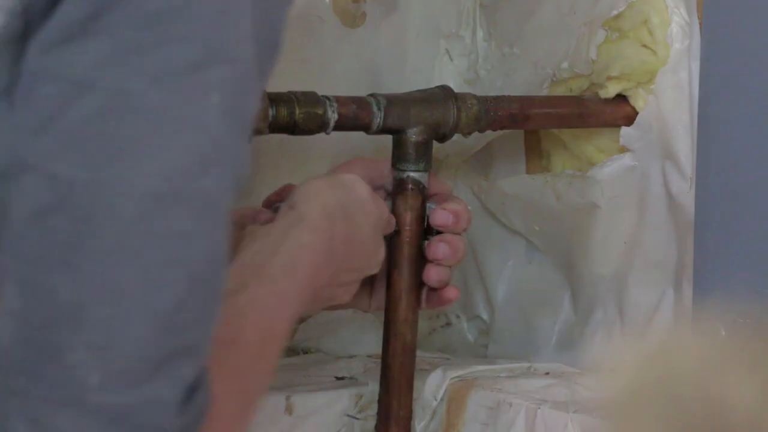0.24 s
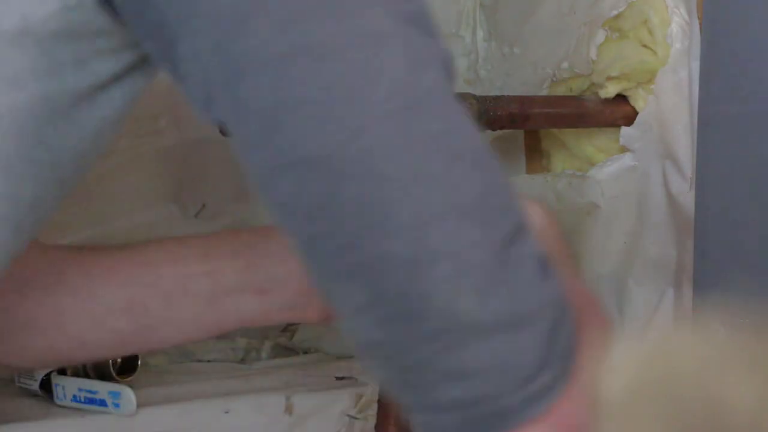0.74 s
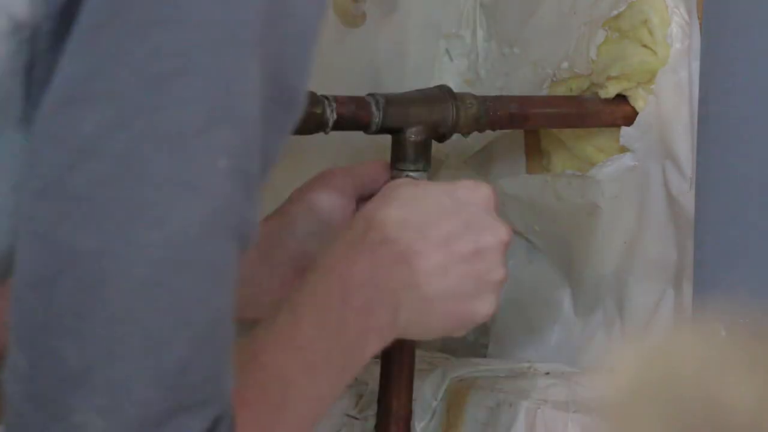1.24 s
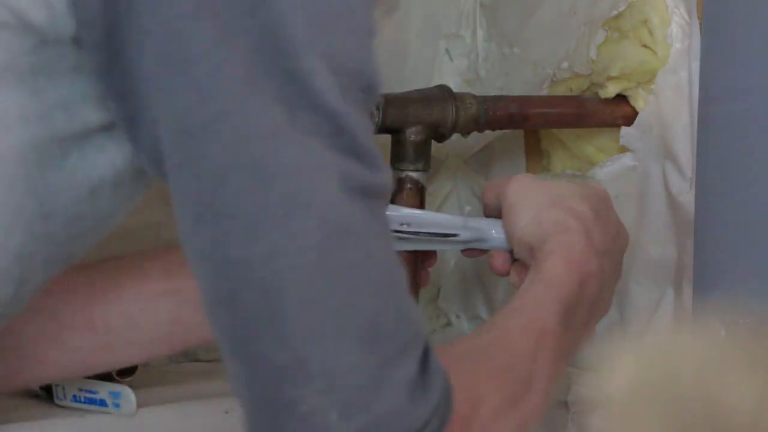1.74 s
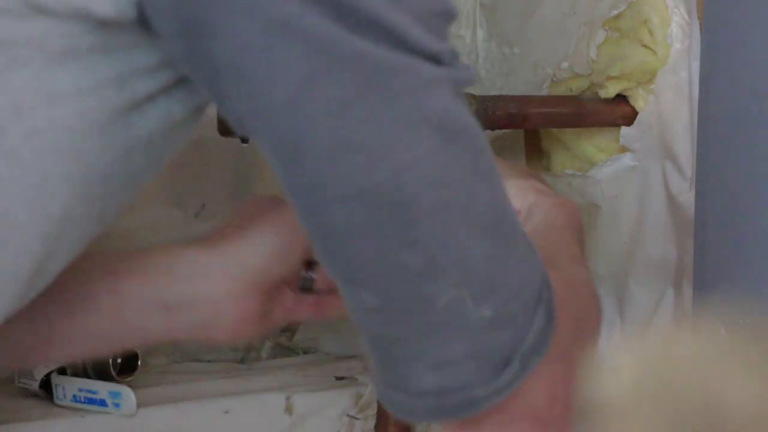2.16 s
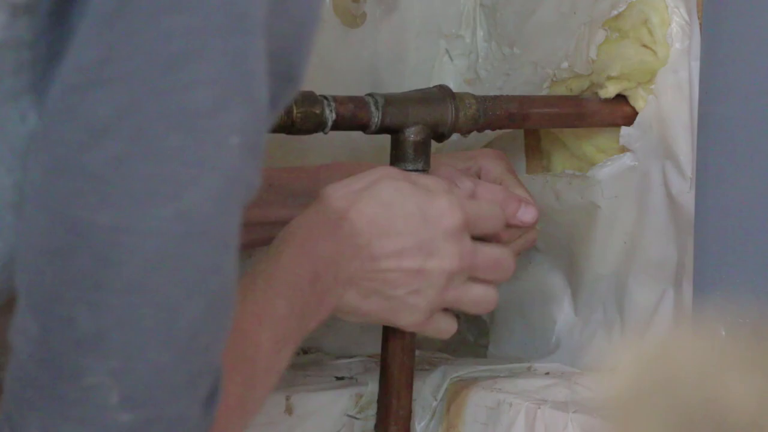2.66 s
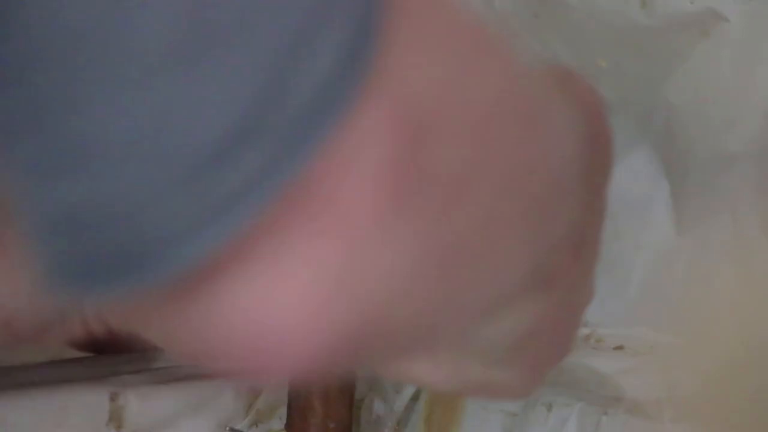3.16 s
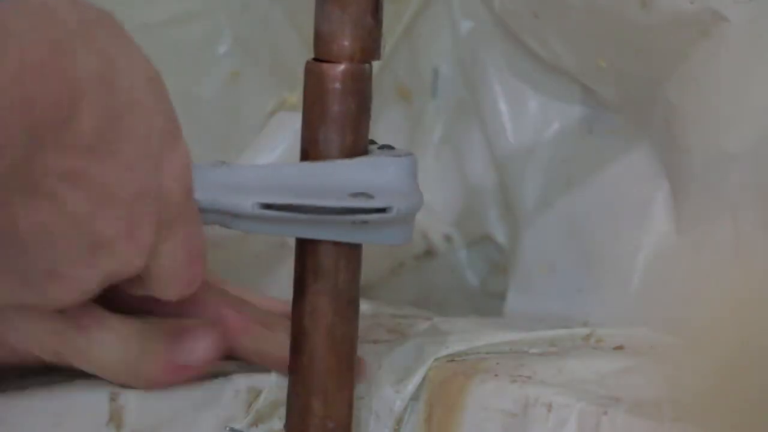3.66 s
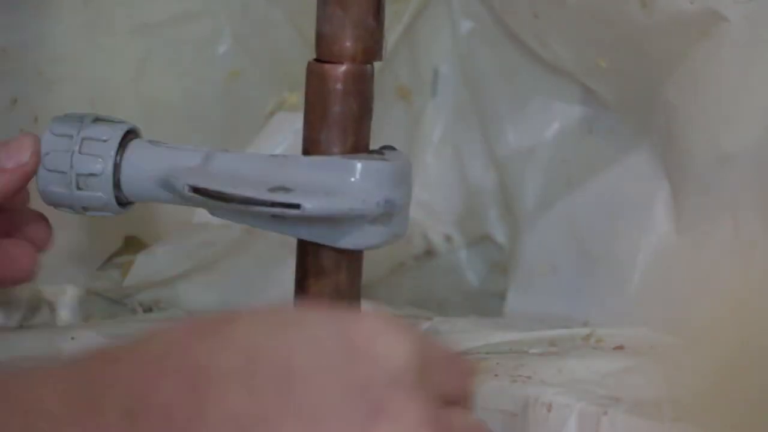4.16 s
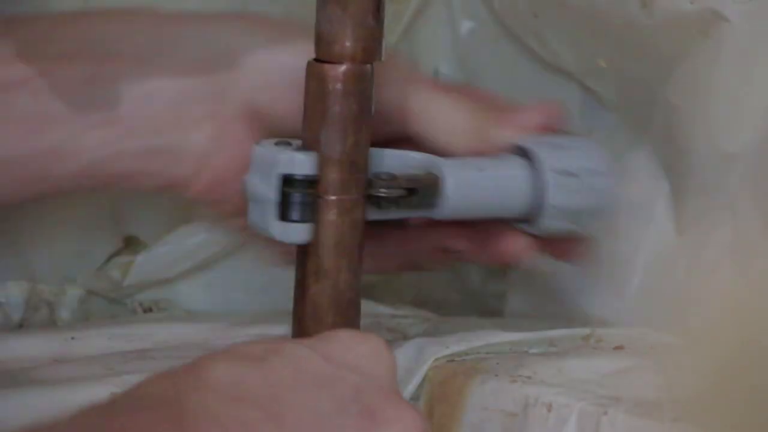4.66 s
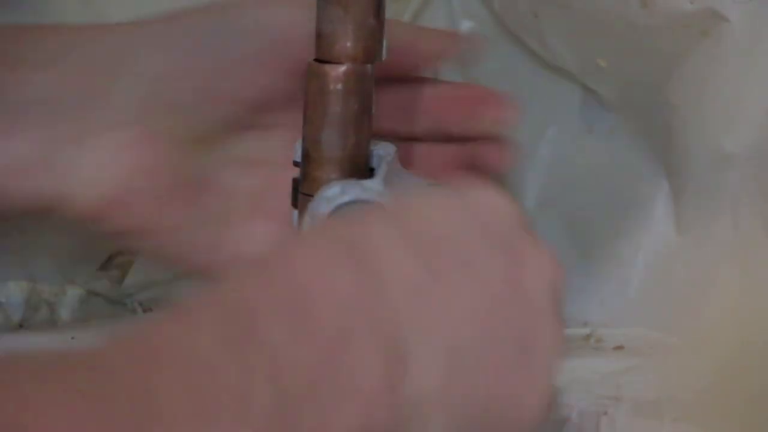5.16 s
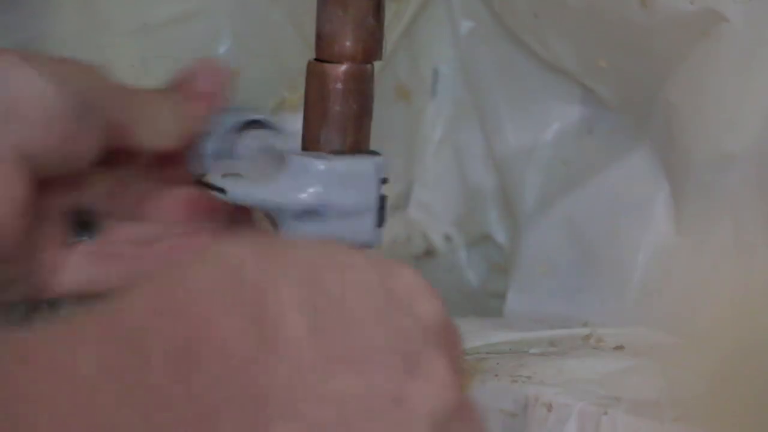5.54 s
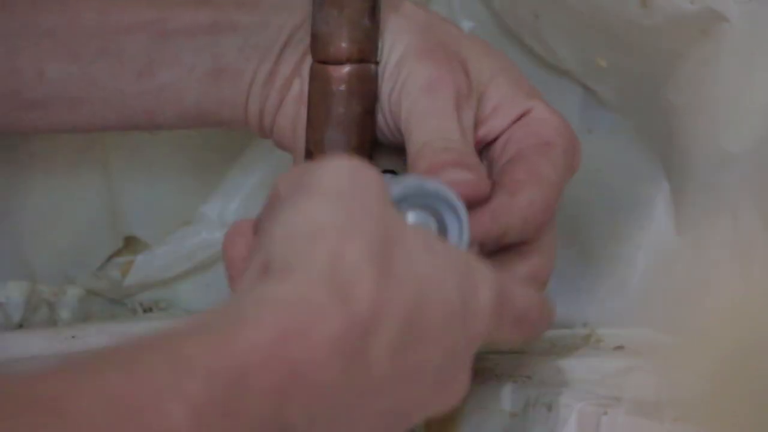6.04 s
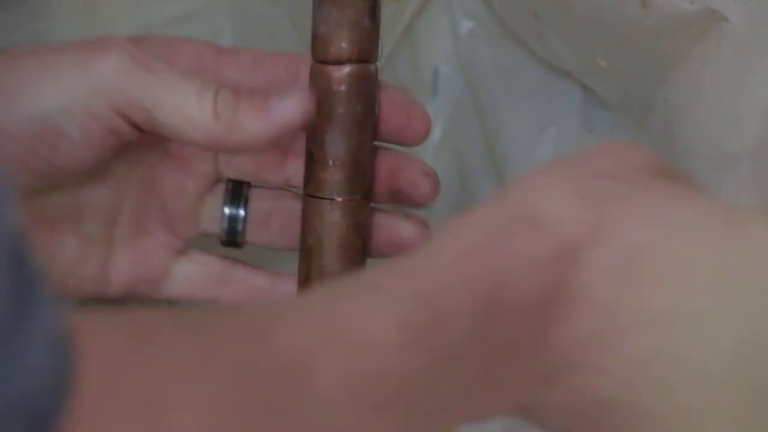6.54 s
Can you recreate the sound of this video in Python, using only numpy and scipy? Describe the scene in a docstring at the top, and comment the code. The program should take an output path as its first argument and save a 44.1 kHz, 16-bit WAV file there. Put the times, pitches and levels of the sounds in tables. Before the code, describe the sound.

In a quiet basement, close to a small microphone, a tubing cutter is worked on a copper pipe. Sparse faint ticks and a few soft thuds come first, then a near-silent gap. From about three seconds sharp metallic clicks cluster with thin scraping; later turns bring rumbling drag, hollow knocks and tiny squeaks. A strong woody thunk comes near the end. Faint mains hum and hiss continue beneath, with a very short room echo.

```python
"""Tubing cutter on a copper pipe

A tubing cutter is swung around a pipe in a quiet basement, close to a small microphone. Noise bursts through
the tool's resonances make its loose parts click; slip noise makes wheel and rollers scrape and rumble, wavering
sines squeak, and decaying modes of pipe and framing thud. Mains hum (sines) and microphone hiss (shaped noise)
lie beneath."""
import sys
import numpy as np
from scipy import signal
from scipy.fft import rfft, irfft
from scipy.io import wavfile
from scipy.ndimage import uniform_filter1d

SR = 44100
rng = np.random.default_rng(int(sys.argv[2]) if len(sys.argv) > 2 else 0)


def master(y):
    """Save y as 16-bit WAV."""
    cut = np.clip(np.atleast_2d(y).T, -1, 1)
    pcm = np.round(cut * 32767)  # scale
    wavfile.write(sys.argv[1], SR, pcm.astype(np.int16))


def voltage_ratio(decibels):
    """Convert decibels (scalar or array-like) to amplitude ratios, 20 dB per decade."""
    exponent = np.asarray(decibels, float) / 20
    return 10 ** exponent


N = 299968

# Modes of the pipe run and framing, shared by knocks and rumble.
# Each row: frequency in Hz, level in dB, undamped-table t60 in seconds (each use sets its own damping).
FRAME_MODES = [(76.4, 22, 0.047), (94, -4.5, 0.53), (133.8, -6, 0.32), (161.2, 3.5, 0.082),
               (216, 0.5, 0.13), (285, 2, 0.088), (310, -8.5, 0.2), (392.6, 0.5, 0.087),
               (459.7, -0.5, 0.046), (586, -13, 0.011), (730, -4.5, 0.078), (903, -11, 0.038),
               (1014, 11, 0.027), (1306, 12, 0.027)]


def level(x, db):
    """Scales a signal to an rms level in dB."""
    return x * voltage_ratio(db) / np.sqrt(np.mean(x ** 2))


def ring(x, hz, width):
    """Two-pole resonance, gain 1 at its centre; width in Hz."""
    return signal.lfilter(*signal.iirpeak(hz, hz / width, fs=SR), x)


def walk(rate):
    """Random levels held 1 / rate s and smoothed twice; spread near 1."""
    hold = int(SR / rate)
    steps = np.repeat(rng.standard_normal(N // hold + 1), hold)
    return 1.3 * uniform_filter1d(uniform_filter1d(steps, hold), hold)[:N]


def grit(rate, spread_db):
    """Random slips, rate per second on average, some larger than the rest; rms 1."""
    slips = rng.random(N) < rate / SR
    sizes = rng.standard_normal(N) * voltage_ratio(spread_db * rng.standard_normal(N))
    return level(slips * sizes, 0)


def strokes(table, rest_db, rest_tint):
    """Strokes swell, hold and fade over the resting contact; the loudest weighs most in the colour."""
    swell_db_per_s, fade_db_per_s = 301, 315
    t = np.arange(N) / SR
    power = voltage_ratio(2 * rest_db) + 0 * t
    colour = power * rest_tint
    for start, hold, db, tint in table:
        swell = swell_db_per_s * (start - t)
        fade = fade_db_per_s * (t - start - hold)
        stroke = voltage_ratio(2 * (db - np.maximum(swell, np.maximum(fade, 0))))
        power = power + stroke
        colour = colour + stroke * tint
    return 10 * np.log10(power), colour / power


def tool_bands(x):
    """Resonances of tool and thin pipe wall; the rows of x drive body, clack, clink and sizzle."""
    # Each row: centre in Hz, width in Hz, gain in dB.
    tool_modes = [(600, 353, 0.5), (954, 184, 6), (1293, 180, 3), (1520, 80, 0), (1750, 270, -2.5),
                  (2208, 236, 3.5), (2275, 173, 4.5), (2990, 437, -4), (3290, 170, 1), (3650, 370, -3),
                  (4300, 530, -7.5), (4840, 450, -11.5), (5400, 127, -9), (5830, 1270, -5.5),
                  (7740, 1970, -3), (8740, 2200, -4), (13900, 6300, -21.5)]
    out = 0
    for k, (hz, width, db) in enumerate(tool_modes):
        row = np.searchsorted([1350, 2600, 5600], hz)  # upper edges of body, clack and clink in Hz
        sign = (-1) ** k  # neighbours alternate in polarity
        out = out + sign * voltage_ratio(db) * ring(x[row], hz, width)
    return out


def hum():
    """Mains hum, beating slowly with a motor that runs just below mains speed."""
    # Each row: frequency in Hz, level in dB rms.
    hum_lines = [(59.2, -86), (60, -104), (120, -67.5), (180, -75)]
    t = np.arange(N) / SR
    out = np.zeros(N)
    for hz, db in hum_lines:
        out += np.sqrt(2) * voltage_ratio(db + 0.21 * walk(11)) * np.sin(2 * np.pi * hz * t)
    return out


def hiss():
    """Smooth room tone and microphone noise: white noise shaped by a spectral curve."""
    # Corners of the curve. Each row: frequency in Hz, relative density in dB per Hz.
    hiss_curve = [(15, -36), (25, -9.5), (70, -2.5), (124, -1.5), (191, -6.5), (225, -8), (347, -8.5),
                  (741, -15), (1340, -15), (2020, -15.5), (3470, -21), (4310, -20), (13800, -24),
                  (15000, -26), (16300, -24)]
    hz, db = np.transpose(hiss_curve)
    f = np.maximum(np.arange(N // 2 + 1) * SR / N, 1)
    gain = voltage_ratio(np.interp(np.log(f), np.log(hz), db))
    return level(irfft(rfft(rng.standard_normal(N)) * gain, N), -63.5)


def squeaks():
    """The wheel squeaks on its axle: stick and slip locks onto one thin mode for a moment."""
    # Each row: start in seconds, length in seconds, frequency in Hz, peak level in dB.
    squeak_table = [(2.624, 0.024, 3410, -61), (3.625, 0.032, 3650, -49), (3.677, 0.0099, 1520, -39),
                    (3.77, 0.019, 1520, -56), (4.632, 0.056, 1750, -62), (5.647, 0.02, 4300, -66),
                    (5.648, .02, 9120, -72), (5.648, .02, 10000, -71), (5.775, 0.019, 10010, -60),
                    (5.78, .018, 13740, -69), (5.79, 0.022, 4340, -65), (6.592, 0.017, 2936, -50)]
    out = np.zeros(N)
    wobble = .5 * walk(150)  # the grip wavers; phase in radians
    for start, length, hz, db in squeak_table:
        t = np.arange(int(length * SR)) / SR
        i = int(start * SR)
        swell = np.sqrt(np.sin(np.pi * t / length))
        tone = np.sin(2 * np.pi * hz * t + wobble[i:i + len(t)])
        out[i:i + len(t)] += voltage_ratio(db) * swell * tone
    return out


def rumble():
    """Rollers and hands drag along the pipe: soft, dense judder shakes the modes of the pipe run."""
    # Each row: start in seconds, hold in seconds, level in dB, spectral centre in Hz.
    drag_table = [(2.95, 0.047, -56.5, 290), (3.44, .15, -51, 310), (3.82, 0.062, -53, 330),
                  (4.29, .015, -54, 290), (4.43, .19, -55, 265), (4.64, 0.14, -50.5, 310),
                  (4.78, 0.02, -46.5, 282), (4.84, 0.088, -59, 236), (5.0, 0.027, -58.5, 255),
                  (5.51, .06, -64.5, 400), (5.65, 0.054, -42.5, 278), (5.71, 0.062, -50, 228),
                  (5.785, 0.014, -43.5, 310), (5.85, 0.18, -53, 235), (6.03, 0.021, -42, 252),
                  (6.11, 0.066, -58, 265), (6.28, 0.083, -48, 258), (6.51, 0.023, -57.5, 222),
                  (6.7, 0.065, -59.5, 247)]
    db, centre_hz = strokes(drag_table, rest_db=-73.5, rest_tint=257)  # hands rest on the pipe
    lowpass = signal.butter(2, 600, fs=SR, output="sos")
    judder = signal.sosfilt(lowpass, grit(1500, spread_db=2))
    modes = 0
    for hz, mode_db, t60 in FRAME_MODES:
        width = 6.5 / t60
        mode = level(ring(ring(judder, hz, width), hz, width), -7.0)
        octaves = np.log2(hz / centre_hz)
        modes = modes + voltage_ratio(mode_db - 8.5 * octaves ** 2) * mode
    # some of it reaches the tool: body, clack, clink, sizzle in dB
    shake = voltage_ratio(np.array([[-6], [-12], [-24], [-40]])) * grit(1200, spread_db=5.0)
    return voltage_ratio(db + 2.3 * walk(14)) * (modes + tool_bands(shake))


def scrape():
    """The wheel is pushed along its groove, and the uneven grinding rings the tool."""
    # Each row: start in seconds, hold in seconds, level in dB, sizzle in dB relative to it.
    scrape_table = [(.15, 0.037, -61, -7), (3.18, .07, -56, -9), (3.27, 0.068, -48.5, -9.5),
                    (3.41, 0.17, -58, -7.5), (3.59, 0.11, -51, -6), (3.635, 0.011, -45, -15.5),
                    (3.72, 0.078, -54, -6.5), (4.6, 0.5, -70, -11), (5.33, 0.069, -60.5, 1),
                    (5.63, .02, -72, -14), (5.67, 0.023, -54.5, -17), (5.77, 0.011, -57, -15),
                    (5.92, 0.12, -64.5, -10), (6.18, 0.072, -63, -6), (6.25, .09, -57.5, -6)]
    db, sizzle_db = strokes(scrape_table, rest_db=-70, rest_tint=-9)  # the wheel rests in the groove
    grind = grit(1500, spread_db=4) + .7 * rng.standard_normal(N)
    grind = grind * voltage_ratio(3 * walk(90))
    drive = grind * voltage_ratio(np.array([db - 15.5, db - 5, db, db + sizzle_db]))
    # narrow modes pass only part of the grit, so the level is made up
    makeup = np.std(grind) / np.std(tool_bands(np.tile(grind, (4, 1))))
    return makeup * tool_bands(drive)


def knocks():
    """Dull blows ring the same modes; place and softness favour those near the blow's centre."""
    # Each row: start in seconds, level in dB, centre of the blow in Hz, damping as a factor,
    # fall-off below the centre in dB per octave squared.
    knock_table = [(0.353, -35.5, 334, 1.3, 13), (0.376, -26.5, 95, 3.7, 16), (0.487, -46.5, 92.6, 3.6, 22),
                   (0.572, -45.5, 282, 2.7, 26), (1.875, -54, 300, 1.6, 22), (1.927, -42.5, 298, 2.5, 20),
                   (2.1, -57, 504, 1.5, 25), (2.447, -43, 137, 1.55, 45), (2.651, -48.5, 350, 1.6, 25),
                   (3.472, -34.5, 296, 1.33, 28), (3.527, -37.5, 303, 2.9, 22), (3.684, -37, 537, 2, 3),
                   (4.283, -41, 300, 1.8, 15), (4.383, -40, 405, 2.5, 22), (4.968, -36, 230, 2.6, 49),
                   (5.135, -46, 224, 2.1, 29), (5.157, -53, 113, 0.85, 16), (5.517, -54.5, 415, 0.3, 39),
                   (5.618, -28.5, 320, 1.4, 15), (5.695, -21, 234, 2.3, 57), (5.71, -44, 191, 0.45, 17),
                   (5.776, -39, 255, 1.6, 9), (5.793, -32, 313, 3.1, 32), (5.853, -42, 285, 0.9, 10),
                   (5.999, -41.5, 253, 0.97, 4), (6.013, -31, 215, 2.9, 33), (6.115, -43.5, 440, 1.7, 10),
                   (6.286, -50, 199, 1.9, 18), (6.311, -34, 258, 1.7, 17), (6.323, -37, 93, 3, 20),
                   (6.504, -40, 157, 1.7, 28), (6.521, -43, 230, 1.4, 33), (6.613, -9.5, 457, 1.33, 78),
                   (6.6243, -23, 400, 2.2, 65), (6.634, -22.5, 410, 1.1, 40), (6.641, -21, 523, 2.2, 22)]
    out = np.zeros(N + SR)
    t = np.arange(SR // 2)[:, None] / SR
    hz, mode_db, t60 = np.transpose(FRAME_MODES)
    for start, db, centre_hz, damping, focus_db in knock_table:
        falloff = np.where(hz < centre_hz, focus_db, 11)  # always 11 above the centre
        gain = voltage_ratio(db + mode_db - falloff * np.log2(hz / centre_hz) ** 2)
        decay = np.exp(-np.log(1000) * t * max(damping, .2) / t60)
        modes = np.sin(2 * np.pi * hz * t) * decay
        # a low blow is a long, soft push
        contact = np.sin(np.pi / 2 * np.minimum(t[:, 0] * centre_hz / 1.03, 1)) ** 2
        i = int(start * SR)
        out[i:i + len(t)] -= contact * (modes @ gain)
    return out[:N]


def clicks():
    """Metal clicks: a sharp first contact, then the tool's loose parts rattle out."""
    # Each row: start in seconds, drive level in dB, body near 1 kHz in relative dB,
    # sizzle in relative dB, rattle t60 in seconds (held to 0.005-0.3 for the decay).
    click_table = [(.038, -49.5, 4.5, -20, 0.029), (.0757, -44.5, -0.5, -20, 0.03),
                   (.192, -52.5, 4.5, -10, 0.039), (.2166, -50, 0, -4, 0.04), (.3496, -36.5, 4, -13, 0.079),
                   (.3641, -48, 23.5, -25, 0.056), (0.6185, -34.5, -1.5, -6.5, 0.054),
                   (.881, -55.5, 6.5, -12, 0.025), (1.0114, -48.5, -8, -17, .12),
                   (1.1104, -47, -1.5, -22, .023), (1.925, -61.5, 15, -12, .059),
                   (2.4276, -50.5, 6.5, 3.5, 0.19), (2.4444, -42, -17, -4, 0.045),
                   (2.6224, -45, -9, -7, 0.11), (2.6552, -47, 5, -8, .038), (2.804, -52, 1, -18, 0.036),
                   (3.1722, -40, -21, -14, 0.12), (3.2047, -26, -9, -12.5, .036),
                   (3.2555, -29.5, -10, -12, 0.041), (3.3273, -22, -17.5, -7, 0.033),
                   (3.3782, -27, -11, -23, 0.019), (3.4244, -41, -13, -13, 0.038),
                   (3.464, -38, -20, -9, 0.055), (3.5068, -39, -8, -22, .03), (3.5307, -39, -9, -10, 0.26),
                   (3.5646, -24, -6, -14, .05), (3.6632, -27.5, -12, -20, 0.032),
                   (3.6782, -29.5, -2.5, -7, 0.061), (3.749, -38.5, -7.5, -13, .09),
                   (3.7698, -40.5, -20, -22, 0.16), (4.005, -41.5, -13, -16, 0.091),
                   (4.268, -36.5, -22, -21, 0.034), (4.291, -41.5, -9, -11, .033),
                   (4.3719, -47.5, -3, -15, 0.14), (5.0076, -38.5, -13.5, -12.5, 0.15),
                   (5.0494, -50.5, 5.5, -3, 0.017), (5.293, -47, -15, -22.5, 0.12),
                   (5.3035, -25, -19.5, -20, 0.044), (5.3171, -30.5, -41, -10.5, 0.034),
                   (5.3626, -38, -9, -16, 0.069), (5.4141, -36.5, -19, -13, 0.028),
                   (5.6133, -49, 12, -25, 0.25), (5.6166, -27.5, 7, -24, 0.054), (5.672, -40, 4, -20, .1),
                   (5.6875, -37.5, 3, -14, 0.06), (5.691, -39, -14, -13, 0.032),
                   (5.7042, -41.5, 5, -8, 0.11), (5.7623, -40, -14, -8, 0.12), (5.7774, -35, -4, -22, .083),
                   (5.8518, -47, 2, -11, 0.063), (5.8633, -41, -13, -14, 0.033),
                   (5.9979, -16.5, -9.5, -8.5, 0.06), (6.0204, -33, -6, -10, 0.14),
                   (6.0394, -51, -5, -4, 0.22), (6.1094, -53.5, 11.5, -14, 0.069),
                   (6.166, -64, 17.5, -12, 0.24), (6.2404, -44, 0.5, -17, .05),
                   (6.2696, -31.5, -20, -3, 0.05), (6.2894, -40.5, -1, -19, .041),
                   (6.3111, -29, -7, -8.5, .05), (6.3345, -40.5, -7, -21, 0.049),
                   (6.3851, -45.5, -6, -10, 0.039), (6.592, -39, -13, -17, 0.36),
                   (6.6, -45, -10, -23, 0.055), (6.6122, -43.5, 22, -16, 0.043),
                   (6.643, -33, -31, -4, 0.049)]
    push = np.zeros((4, N + SR))
    t = np.arange(SR // 4) / SR
    rattles = rng.standard_normal((len(click_table), len(t)))
    for (start, db, body_db, sizzle_db, t60), rattle in zip(click_table, rattles):
        burst = rattle * np.exp(-np.log(1000) * t / np.clip(t60, .005, .3))
        bounce_db = 3 * np.repeat(rattle[::-1], SR // 500)[:len(t)]
        burst *= voltage_ratio(bounce_db)  # the parts bounce unevenly, in steps of 2 ms
        burst *= 1 + 1.31 * np.exp(-t / 0.00072)  # the crack of first contact
        burst[0] += 9.2 * np.exp(-t60 / 0.1)  # a long rattle starts from a softer contact
        clack_db = 3.5 + 0.49 * body_db  # the clack near 2 kHz partly follows the body
        drive_db = db + np.array([[body_db], [clack_db], [0], [sizzle_db]])
        i = int(start * SR)
        push[:, i:i + len(t)] += voltage_ratio(drive_db) * burst
    return tool_bands(push[:, :N])


def room(near):
    """Short echo of a cluttered basement: decaying noise that starts after 4 ms."""
    t60_s, echo_db = 0.09, -10
    t = np.arange(SR // 2) / SR
    walls = rng.standard_normal(len(t)) * np.exp(-np.log(1000) * t / t60_s) * (t > .004)
    walls = level(walls, echo_db) / np.sqrt(len(t))  # total energy at echo_db
    return signal.fftconvolve(near, walls)[:N]


def scene():
    """The work sounds from close by with its echo, over hum and hiss."""
    near = squeaks() + rumble() + scrape() + knocks() + clicks()
    mix = near + room(near) + hum() + hiss()
    return mix[None]


def top_cut(x):
    """Nothing passes above the cut-off."""
    return signal.sosfilt(signal.butter(12, 16430, fs=SR, output="sos"), x)


def record(dry):
    """The microphone loses the deepest bass and the top of the treble."""
    highpass = signal.butter(6, 52, "high", fs=SR, output="sos")
    lowpass = signal.ellip(10, .3, 80, 15750, fs=SR, output="sos")
    passed = signal.sosfilt(lowpass, signal.sosfilt(highpass, dry))
    return top_cut(passed)


dry = scene()
out = record(dry)
master(out)
```